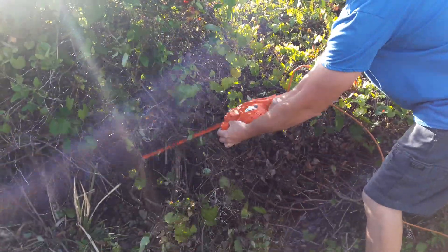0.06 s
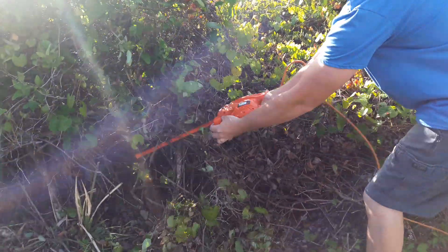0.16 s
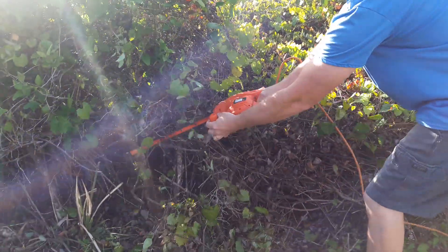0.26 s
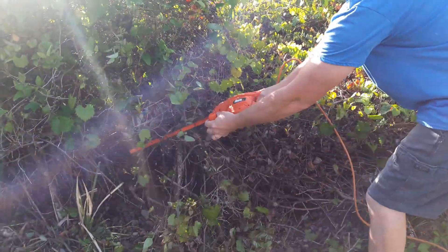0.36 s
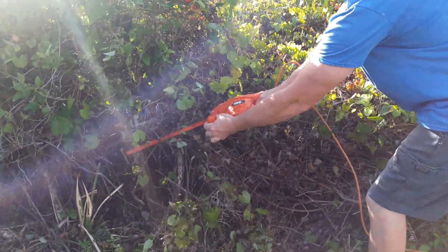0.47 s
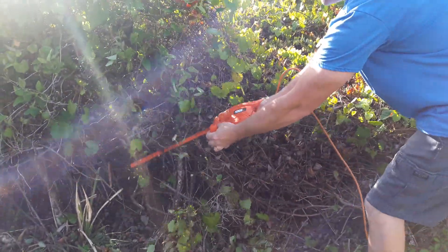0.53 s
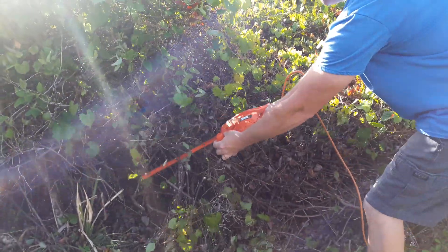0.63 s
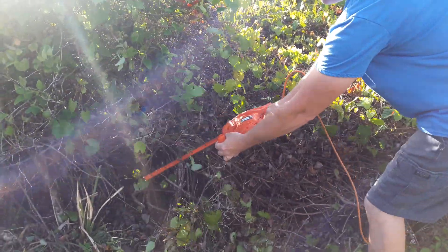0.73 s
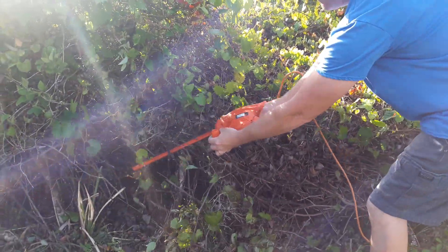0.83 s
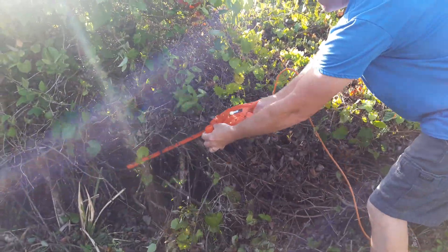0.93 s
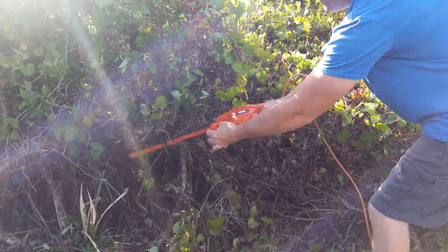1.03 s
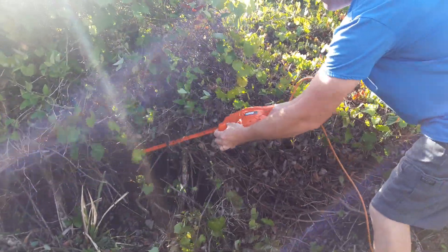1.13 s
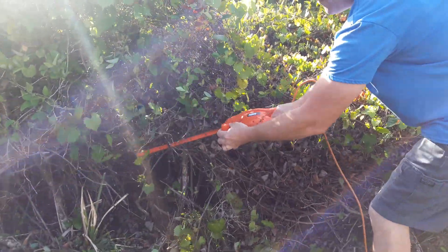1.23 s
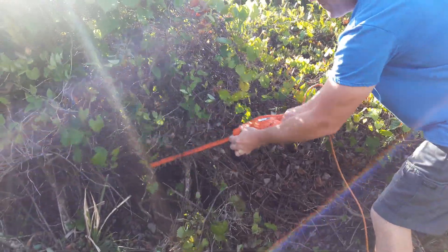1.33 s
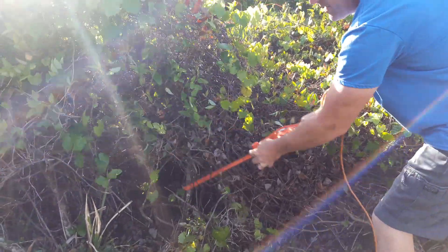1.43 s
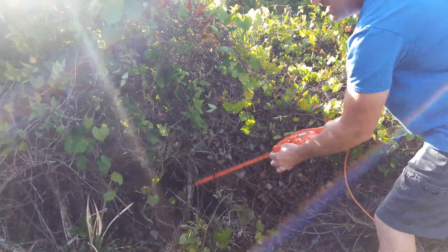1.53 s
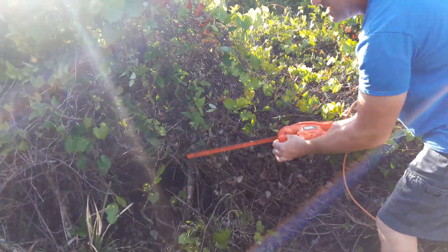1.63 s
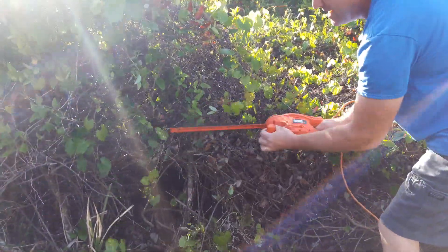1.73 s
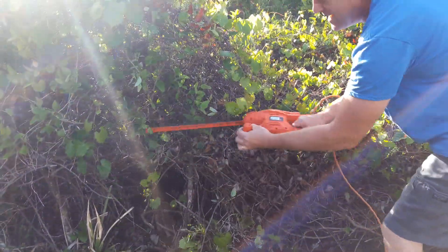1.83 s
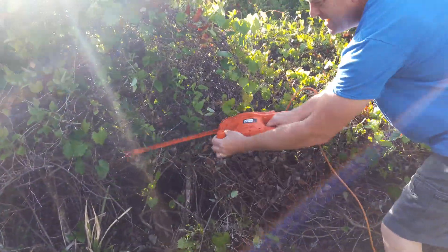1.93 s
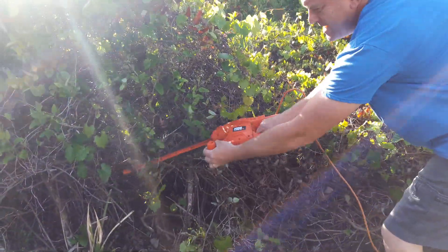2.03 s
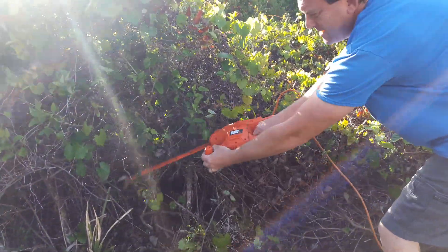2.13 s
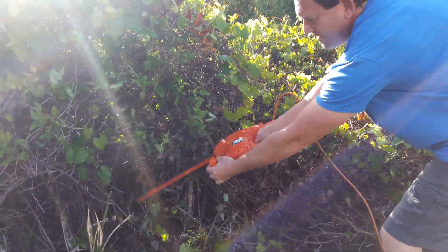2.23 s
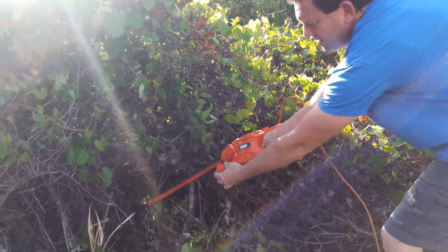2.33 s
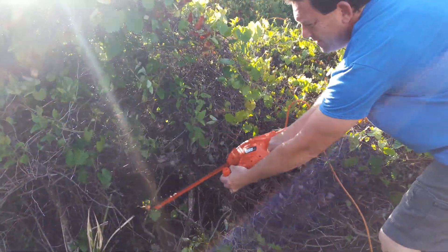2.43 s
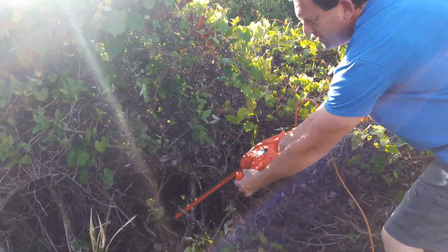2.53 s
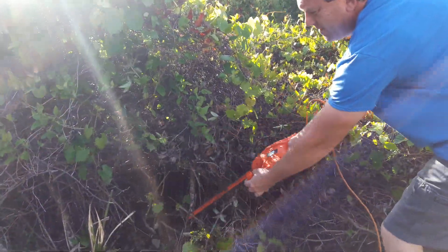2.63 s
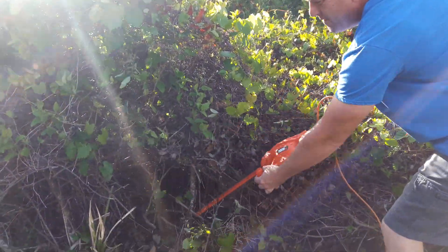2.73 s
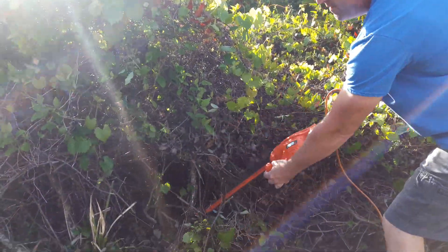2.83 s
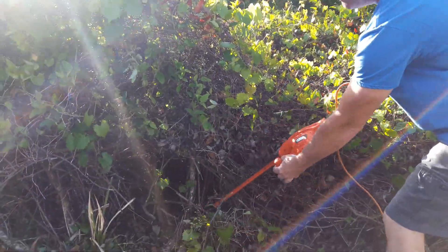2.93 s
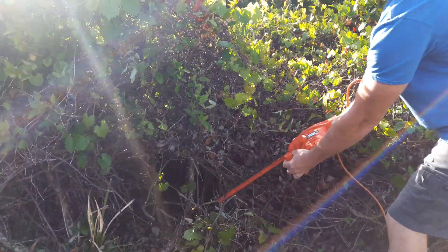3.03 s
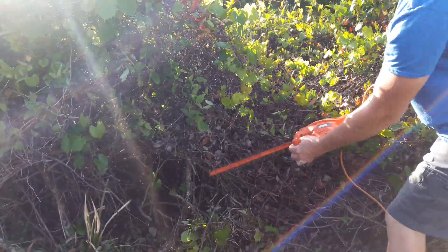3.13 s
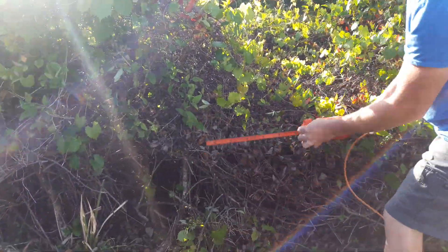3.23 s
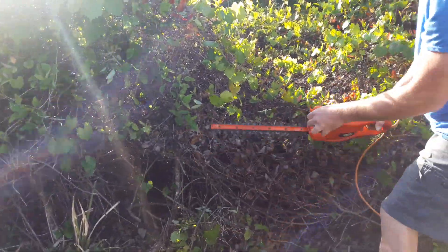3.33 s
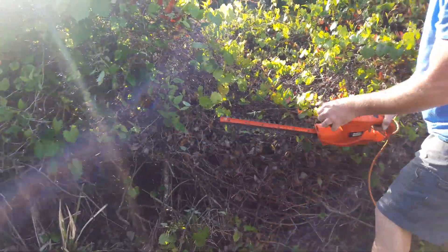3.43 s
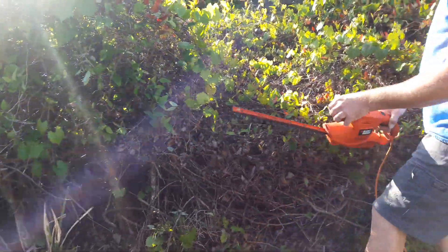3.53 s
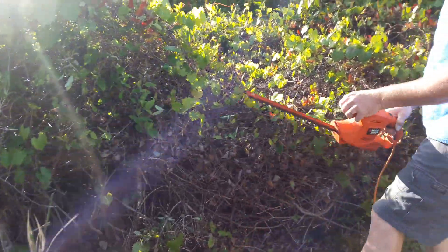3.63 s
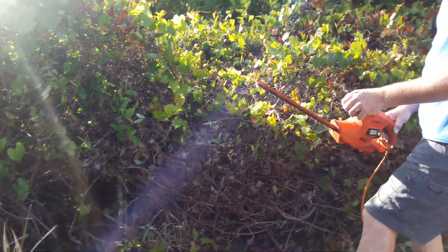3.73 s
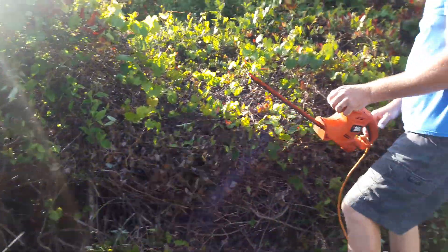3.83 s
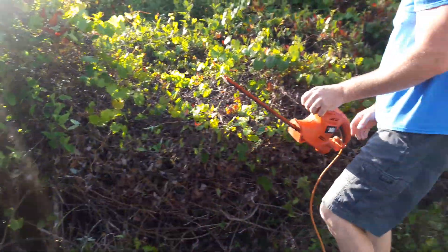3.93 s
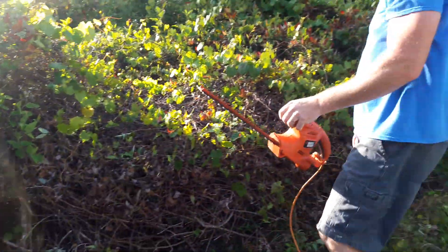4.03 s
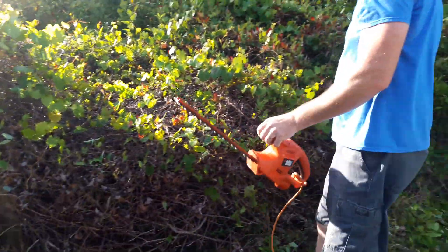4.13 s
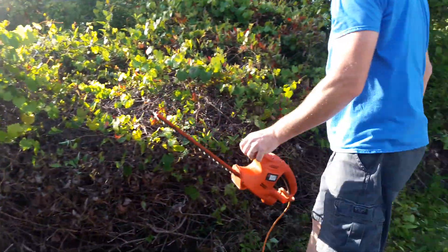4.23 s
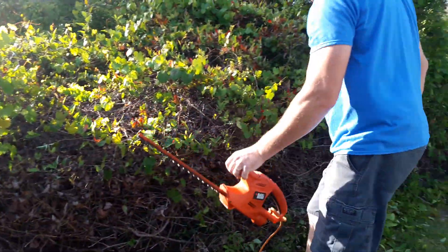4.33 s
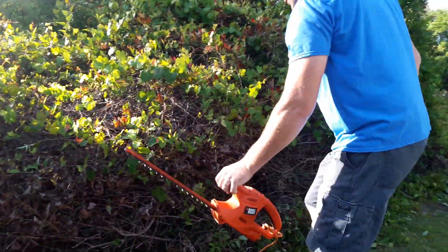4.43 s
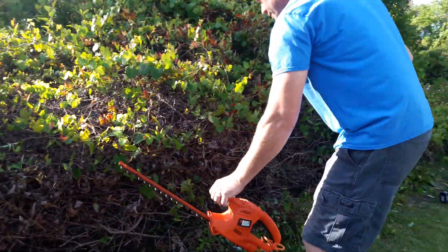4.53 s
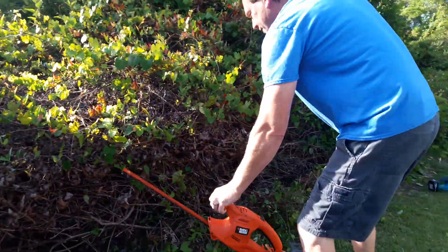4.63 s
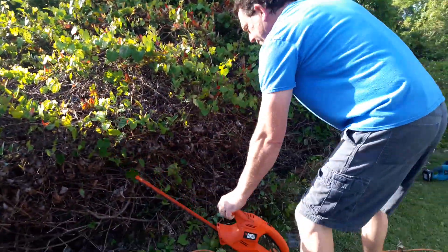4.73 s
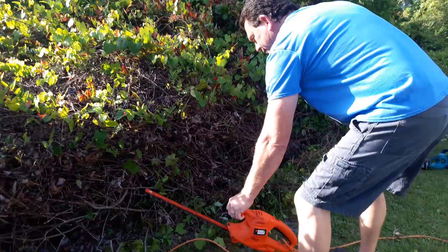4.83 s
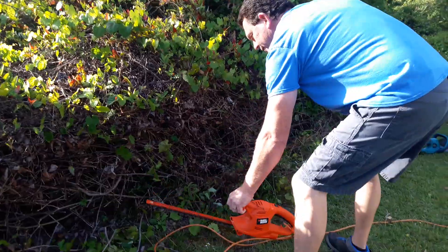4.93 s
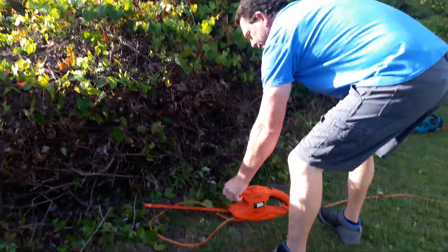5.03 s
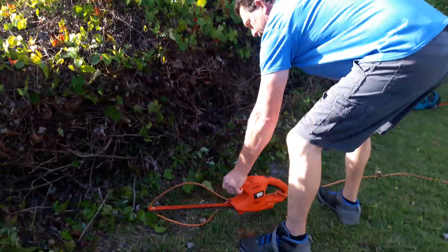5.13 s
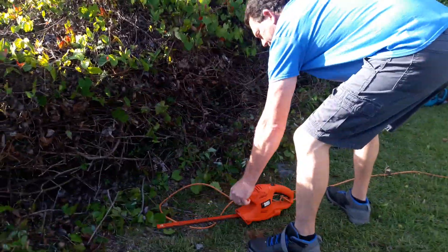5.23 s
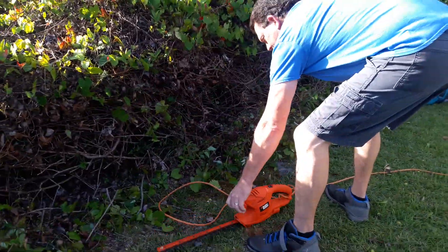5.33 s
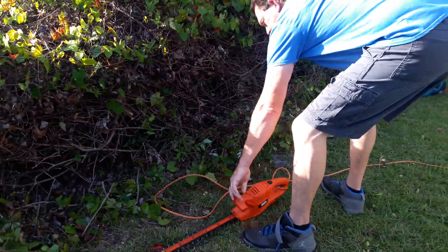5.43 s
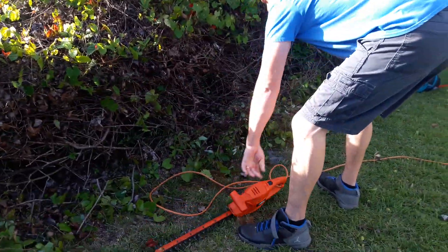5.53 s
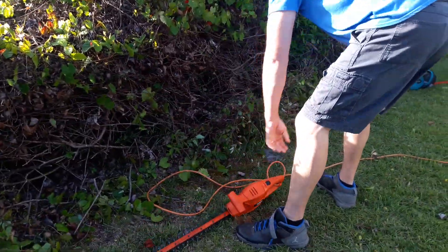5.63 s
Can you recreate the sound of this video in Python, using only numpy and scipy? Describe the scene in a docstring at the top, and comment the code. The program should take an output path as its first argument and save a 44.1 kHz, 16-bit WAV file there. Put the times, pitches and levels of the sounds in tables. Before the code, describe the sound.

Close outdoor stereo capture of an electric hedge trimmer already running: rough gear whine, gritty grinding and rapid blade chatter, with irregular twig clacks and snips as it bites into brush. Just after three seconds the power is released; the whine slides downward for about two seconds, rattling loosely, with soft footfalls and cloth rustle. It stops, and faint stalks crackle in the grass over a light breeze.

```python
"""Electric hedge trimmer in dry brush

A corded trimmer works a few steps away: meshing gears whine, sliding parts grind as noise rung through the
resonances of its body, and the blades clack at the ends of their stroke and on twigs. Switched off at 3.21 s,
it coasts to rest at 5.318 s, rattling, while it is carried off and laid in the grass. Damped thuds make the
footfalls and soft knocks; shaped noise makes snips, cloth, stalks, faint garden air and a light breeze."""
import sys
import numpy as np
from scipy import signal
from scipy.fft import rfft, irfft, next_fast_len
from scipy.io import wavfile
from scipy.ndimage import uniform_filter1d, map_coordinates

SR = 44100
rng = np.random.default_rng(int(sys.argv[2]) if len(sys.argv) > 2 else 0)


def wav_out(sig):
    """Save sig, one row per channel (or a flat mono array), as 16-bit PCM at SR to the path in sys.argv[1]."""
    wavfile.write(sys.argv[1], SR, np.round(np.clip(np.atleast_2d(sig).T, -1, 1) * 32767).astype(np.int16))


N = 250482

PINION_TEETH, WHEEL_TEETH = 6, 79  # teeth on the rotor shaft and on the wheel that drives the blades
FULL_HZ = 2400  # tooth rate at working speed
TOP_HZ = 15750  # upper band limit
OFF_S, UNLOAD_S = 3.21, 0.065  # the switch is released; time for the gears to lose their pressure
# coasting: braking by dry friction, tooth rate at which fan drag equals it, standstill
DRY_HZ_PER_S, DRAG_KNEE_HZ, STOP_S = 722.6, 1572, 5.318

# Speed under power, sagging in thick brush. Each row: time in seconds, gear tooth rate in Hz.
POWERED_SPEED = [(0, 2330), (.15, 2272), (.45, 2218), (.7, 2385), (1, 2470), (1.3, 2482), (1.56, 2488),
                 (1.64, 2440), (2.1, 2485), (2.32, 2368), (2.47, 2343), (2.6, 2404), (2.72, 2422),
                 (2.82, 2372), (2.91, 2217), (3.05, 2261), (3.2, 2320)]
# How hard the blades work in the brush. Each row: time in seconds, effort in dB.
CUTTING_EFFORT = [(0, 2), (.35, 0.5), (.75, -1.5), (1.2, 1), (1.55, -3), (1.9, -2), (2.3, 1.5), (2.7, -2),
                  (2.93, -3), (3.2, -2)]
# Resonances of housing, gearbox and blades. Each row: centre in Hz, width in Hz, relative gain in dB.
BODY_MODES = [(410, 44, -18.5), (555, 127, -9), (1097, 205, -3), (1320, 127, -9), (2186, 277, -1.5),
              (2490, 247, 2), (3374, 510, -3), (4520, 540, -6), (5555, 830, -7), (6810, 770, -9.5),
              (9070, 1100, -15), (11650, 2700, -15.5), (14200, 1900, -22.5)]
# Broad friction noise under the resonances. Each row: frequency in Hz, relative density in dB per Hz.
FRICTION_SPECTRUM = [(30, -77), (120, -57), (250, -27.5), (400, -18), (1500, -11), (1800, -18.5),
                     (2850, -31), (6000, -15.5), (8000, -17.5), (16000, -32.5)]
# Bands of housing, gearbox, blade and blade-edge hiss. Each row: lower edge in Hz, upper edge in Hz.
BODY_BAND_EDGES = [(0, 1700), (1700, 3800), (3800, 7800), (7800, 15700)]
# Sliding noise of those four bands. Each row: level in dB at full speed before effort, share of the effort,
# drop without power in dB, dB lost per tenfold slowing, tooth rate in Hz below which it dies.
SLIDING_LEVELS = [(-28.5, 0.33, 4, 17.5, 43), (-26.5, 0.49, 4, 18.5, 500), (-26.5, .9, 0.5, 26, 67),
                  (-33, 0.24, 2.1, 24, 140)]
# Treble of the blade-edge hiss. Each row: time in seconds, gain in dB.
HISS_GAIN = [(0, 1.5), (.3, 0.6), (.7, -1), (1.4, -2), (1.65, 1.5), (1.9, 0), (2.2, 0.5), (3.5, .5),
             (3.9, -3.5)]
# Blades catching on twigs. Each row: start in seconds, level in dB, then relative to it and before the
# common offsets: gearbox ring in dB, twig snap in dB.
TWIG_CLACKS = [(0.039, -10, -11, -18), (0.195, -13, -11, -4.5), (0.248, -11.5, -11, -7.5),
               (0.3183, -7.5, -14, -19), (0.3518, -6.5, -9.5, -14), (0.3885, -5, -24, -24),
               (0.4244, -11.5, -38, -18.5), (0.5506, -11, -11, -10), (1.3643, -4, -12, -32),
               (1.568, -9.5, -31, -13), (1.6023, -14.5, -21, -3), (1.8125, -7, -14.5, -18),
               (1.9789, -13.5, -5.5, -25), (2.132, -11, -9.5, -5), (2.1948, -12, -0.5, -2.5),
               (2.2425, -9, -6.5, -17.5), (2.4083, -8, -5.5, -17), (2.724, -9.5, -5, -14.5),
               (2.788, -9.5, -10.5, -15.5), (2.822, -3.5, -7.5, -21.5), (2.8564, -6, -13.5, -27.5),
               (2.8923, -6, -6.5, -24.5), (3.2257, -15, -2.5, -36), (3.2428, -8.5, -8, -17),
               (3.736, -15.5, -5.5, -31)]
# Radiation of gear overtones by the housing. Each row: frequency in Hz, gain in dB.
HOUSING_RADIATION = [(200, -28), (600, -16), (1150, 0), (1700, -13), (2400, -3), (3400, -6), (4200, 4.5),
                     (5100, -5.5), (5800, 2.5), (6900, 2), (7700, 0.5), (10000, -19), (12000, -37),
                     (16000, -34)]
# Gear overtones from the third multiple of the tooth rate upwards. Each entry: relative level in dB.
OVERTONE_LEVELS = [-3, -2, -0.5, -8.5, -1, -1.5, 1.5, -3.5, -8, -8, -13, -8.5]
# The whine's octave. Each row: time in seconds, level in dB before the body resonances.
OCTAVE_LEVEL = [(0, -40), (.35, -31.5), (.55, -28), (.9, -36.5), (2.15, -36.5), (2.45, -23.5), (2.65, -31),
                (2.92, -25.5), (3.15, -28), (3.3, -42), (3.55, -33.5), (3.9, -37.5), (4.5, -34.5)]
# Rotor hum, first multiples of the shaft rate. Each entry: level in dB at top speed before radiation.
ROTOR_LEVELS = [-46.5, -45.5, -47]
# Breeze rumble. Each row: time in seconds, level in dB before the channel balance.
BREEZE_LEVEL = [(0, -52), (.8, -63.5), (1.5, -54), (1.75, -48), (2.4, -66), (3.7, -63), (4.2, -51.5),
                (5, -48.5), (5.68, -51.5)]
# Colour of the breeze. Each row: frequency in Hz, relative density in dB per Hz.
BREEZE_SPECTRUM = [(15, -42), (30, -34), (60, -2.5), (95, 2.5), (130, 1.5), (180, -6.5), (300, -14),
                   (700, -12), (2000, -93)]
# Colour of the garden air. Each row: frequency in Hz, relative density in dB per Hz.
GARDEN_SPECTRUM = [(100, -24.5), (250, -4.5), (550, -9), (800, -14), (1200, -6.5), (1800, -21),
                   (5000, -18.5), (15500, -38)]
# Footfalls and soft knocks. Each row: start in seconds, level in dB, pitch in Hz, 60 dB decay in seconds.
THUDS = [(1.683, -33, 165, 0.062), (4.26, -35, 107, 0.076), (4.267, -33, 220, 0.046),
         (4.343, -25, 304, 0.022), (4.703, -34, 282, 0.039), (4.952, -38, 125, 0.11),
         (5.025, -39, 85, 0.13), (5.269, -44.5, 94, 0.06), (5.418, -48, 129, 0.043)]
# Resonances of the loosely rattling blades. Each row: centre in Hz, width in Hz, relative gain in dB.
LOOSE_BLADE_MODES = [(1260, 150, -9), (2820, 340, 2.5), (4160, 290, 0.5), (5030, 200, -3)]
# Resonance of the free gears in their case. Each row: centre in Hz, width in Hz, relative gain in dB.
GEARCASE_MODES = [(2490, 144, 0)]
# Clothes and cord brushing past. Each row: centre in seconds, level in dB, half length in seconds.
CLOTH_SWELLS = [(4.25, -49.5, 0.237), (4.72, -51, 0.07)]
# Grass bending under the trimmer. Each row: centre in seconds, level in dB, half length in seconds.
GRASS_SWELLS = [(5.365, -56, 0.022), (5.52, -50.5, 0.074), (5.66, -75, 0.071)]
# Colour of the bending stalks. Each row: frequency in Hz, relative density in dB per Hz.
STALK_SPECTRUM = [(100, -17), (350, 3.5), (750, -4), (1500, -11), (4000, -13.5), (10000, -21.5),
                  (15500, -35)]
# Stalks that crack under the trimmer. Each row: start in seconds, level in dB.
STALK_CRACKS = [(5.489, -46), (5.511, -46.5), (5.541, -55)]
# Echo off the lawn, closing in as the tool is lowered. Each row: time in seconds, delay in seconds.
LAWN_DELAY = [(3.9, .0031), (4.8, 0.00069)]
# Share of the side signal that is the direct wave. Each row: frequency in Hz, share from 0 to 1.
DIRECT_SHARE = [(100, .3), (400, 0.2), (1100, 0.3), (2400, 0.7), (4500, 1), (7000, .15), (16000, .05)]
# Stereo width. Each row: frequency in Hz, side minus mid in dB.
SIDE_GAIN = [(100, -1.5), (250, -16.5), (400, -26.5), (700, 0), (1100, -13.5), (1700, 5.5), (2400, -13.5),
             (3300, -4), (4500, -1.5), (7000, 2), (10000, -1), (15000, 0)]
# Stereo balance. Each row: frequency in Hz, left minus right in dB.
LEFT_RIGHT = [(250, 1), (420, 4.5), (650, 1), (1100, 0.6), (2400, -2.5), (4400, 2.5), (8000, 1),
              (12000, -1)]


def amp(db):
    """Logarithmic level: decibels become an amplitude gain."""
    return 10 ** (np.asarray(db) / 20)


def unit(x):
    """Normalisation: the signal is scaled to rms 1."""
    return x / np.sqrt(np.mean(x ** 2) + 1e-20)


def along(points, hz):
    """Log-frequency interpolation: (Hz, value) points are read between their knots."""
    knots_hz, values = np.transpose(points)
    return np.interp(np.log(hz + 1), np.log(knots_hz + 1), values)


def curves(rows):
    """Linear interpolation in time: one value per sample for each column after the time."""
    s, *columns = np.transpose(rows)
    return [np.interp(np.arange(N) / SR, s, column) for column in columns]


def wobble(rate):
    """Slow random modulation: a smooth curve through random knots, rate of them a second."""
    knots = rng.standard_normal(int(N * rate / SR) + 4)
    return map_coordinates(knots, [np.arange(N) * rate / SR])


def filtered(x, response):
    """Linear filtering: the spectrum of x is multiplied by a response of frequency."""
    m = next_fast_len(N + 8192)
    return irfft(rfft(x, m) * response(np.fft.rfftfreq(m, 1 / SR)), m)[..., :N]


def noise(spectrum):
    """Coloured noise: two unrelated channels of joint rms 1 in the given colour."""
    white = rng.standard_normal((2, N))
    return unit(filtered(white, lambda hz: amp(along(spectrum, hz))))


def burst(s, rise, fall):
    """Impulsive excitation: slice and envelope of a short swell that starts at s and peaks at 1."""
    t = np.arange(SR // 20) / SR
    shape = (1 - np.exp(-t / rise)) ** 2 * np.exp(-t / fall)
    start = int(s * SR)
    return slice(start, start + len(t)), shape / shape.max()


def swells(rows):
    """Gaussian envelopes: soft, bell-shaped swells are summed."""
    t = np.arange(N) / SR
    return sum(amp(db) * np.exp(-((t - s) / half_s) ** 2) for s, db, half_s in rows)


def resonant(modes, hz):
    """Modal resonance: the powers of steep-sided peaks add."""
    power = 0
    for centre, width, db in modes:
        power = power + amp(db) ** 2 / (1 + 2 * ((hz - centre) / width) ** 2) ** 2
    return np.sqrt(power)


def tooth_rate():
    """Braked rotation: the motor turns against the brush; then fan drag and dry friction slow it."""
    left_s = STOP_S - np.arange(N) / SR
    angle = np.clip(left_s * DRY_HZ_PER_S / DRAG_KNEE_HZ, 0, np.arctan(2))
    coast_hz = DRAG_KNEE_HZ * np.tan(angle)
    return np.minimum(curves(POWERED_SPEED)[0], coast_hz)


def coasting():
    """Unloading of the gears: 0 under power, 1 once they run free."""
    return np.clip((np.arange(N) / SR - OFF_S) / UNLOAD_S, 0, 1)


def slowed(tooth_hz, decade_db, stall_hz=90):
    """Power law of speed: the gain falls by decade_db per tenfold slowing and dies near standstill."""
    return amp(decade_db * np.log10(tooth_hz / FULL_HZ + 1e-6)) * np.tanh(tooth_hz / stall_hz)


def body(hz):
    """Body response: the tool's resonances stand over its broad friction noise, adding in power."""
    return np.hypot(resonant(BODY_MODES, hz), amp(along(FRICTION_SPECTRUM, hz)))


def body_bands(drive):
    """Forced vibration: the drive rings the body, split into four bands of rms 1."""
    rung = filtered(drive, body)
    return [unit(filtered(rung, lambda hz: (hz >= lo) & (hz < hi))) for lo, hi in BODY_BAND_EDGES]


def swing(x, depth_db=2.16):
    """Directivity: as the lobed source is swung, narrow patches of its spectrum swell and fade."""
    z = signal.stft(x, nperseg=1024)[2]
    field = rng.standard_normal(z.shape)
    field = uniform_filter1d(field, size=4, axis=1)  # across frequency
    field = uniform_filter1d(field, size=22, axis=2)  # across time
    return signal.istft(z * amp(depth_db * unit(field)), nperseg=1024)[1][:, :N]


def rubbing(teeth, knock_db=1.5, shaft_db=0.5, chatter_db=0.75, grain_db=1.53, fall=0.43):
    """Sliding friction: noise leaps at each blade reversal and throbs with each turn of the rotor."""
    strokes = 2 * teeth / WHEEL_TEETH
    force = (.5 + rng.random(int(strokes.max()) + 1))[strokes.astype(int)]  # one draw per stroke
    jolt = unit(force * np.exp(-(strokes % 1) / fall))
    shaft = np.cos(2 * np.pi * teeth / PINION_TEETH)
    pressure_db = knock_db * jolt + shaft_db * shaft + chatter_db * wobble(170) + grain_db * wobble(1800)
    return swing(amp(pressure_db) * rng.standard_normal((2, N)))


def grind(tooth_hz, teeth, drift_db=0.17, flutter_db=-0.31):
    """Friction-driven resonance: sliding gears and blades ring the body, louder with effort and speed."""
    housing, gearbox, blade, hiss = body_bands(rubbing(teeth))
    bands = housing, gearbox, blade, hiss * amp(curves(HISS_GAIN)[0])
    effort_db, = curves(CUTTING_EFFORT)
    out = 0
    for band, (db, share, off_db, decade_db, stall_hz) in zip(bands, SLIDING_LEVELS):
        level_db = db + share * effort_db - off_db * coasting()
        level_db = level_db + drift_db * wobble(4.94) + flutter_db * wobble(22.02)
        out = out + band * amp(level_db) * slowed(tooth_hz, decade_db, stall_hz)
    return out


def catches(tooth_hz, teeth, catch_db=-20.5, scatter_db=3, ring_db=-5.0, snap_db=-16, decade_db=17):
    """Reciprocating impact: a small clack of random strength at each reversal of the blades."""
    stroke = WHEEL_TEETH / 2
    reversals = np.searchsorted(teeth, np.arange(1, teeth[-1] / stroke - 2) * stroke)
    chance_db = np.clip(rng.standard_normal((len(reversals), 2)), -2, 2) * scatter_db
    speed_db = decade_db * np.log10(tooth_hz / FULL_HZ + 1e-6)
    level_db = catch_db + curves(CUTTING_EFFORT)[0] + speed_db
    return [(n / SR, level_db[n] + size, ring_db - dry / 2, snap_db + dry / 2)
            for n, (size, dry) in zip(reversals, chance_db)]


def clacks(tooth_hz, teeth, gearbox_db=-3, blade_db=-17, follow=0.44, snap_db=-4.5, tonal=0.87):
    """Impact: jolted blades make the gear teeth hammer for a few milliseconds, and wood snaps."""
    _, gearbox, blade, snap = body_bands(rng.standard_normal((2, N)))
    tonal = tonal * (1 - coasting() ** 2)  # only under power
    noisy = np.sqrt(1 - tonal ** 2)

    def hammer(k):
        """Periodic impact: a tone at a multiple of the tooth rate with an unsteady phase."""
        return np.sqrt(2) * np.sin(2 * np.pi * k * teeth + .5 * wobble(400))

    octave_db, = curves(OCTAVE_LEVEL)
    gearbox = tonal * hammer(1) + noisy * gearbox
    blade = (tonal * hammer(2) + noisy * blade) * amp(follow * (octave_db - octave_db.mean()))
    out = np.zeros((2, N))
    for s, db, ring, crack in list(TWIG_CLACKS) + catches(tooth_hz, teeth):
        at, swell = burst(s, rise=.0012, fall=.0038)
        _, sharp = burst(s, rise=0.00023, fall=0.0076)
        metal = amp(ring + gearbox_db) * gearbox[:, at] + amp(blade_db) * blade[:, at]
        wood = amp(crack + snap_db) * snap[:, at]
        out[:, at] += amp(db) * (swell * metal + sharp * wood)
    return out


def whine(tooth_hz, teeth, jitter=0.034, rough_db=4.5, slack=0.23, eccentric=0.22, lobes_db=2,
          tooth_db=-37, tooth_off_db=6, upper_db=-42, upper_free_db=4, decade_db=3, fade_hz=420,
          low_decade_db=14, low_fade_hz=600, ringing=0.52):
    """Gear mesh tones: slight backlash roughens each overtone, which swells and fades as the tool swings."""
    # with the power off the teeth mesh more loosely and the tone moves into the overtones
    free = coasting()
    loose = 1 + slack * free
    phase = 2 * np.pi * (teeth + loose * jitter * wobble(70) + 0.011 * wobble(300))

    def tone(k):
        """Harmonic motion: a rough multiple of the tooth rate, its phase drifting between mid and side."""
        size = unit(amp(loose * rough_db * wobble(60) + lobes_db * wobble(14)))
        drift = np.array([np.zeros(N), 2 * wobble(4)])
        return np.sqrt(2) * size * np.sin(k * phase + drift)

    overtones, power = 0, 1
    for k, db in enumerate(OVERTONE_LEVELS, 3):
        gain = amp(db + along(HOUSING_RADIATION, k * tooth_hz)) * (k * tooth_hz < TOP_HZ)
        overtones = overtones + gain * tone(k)
        power = power + gain ** 2
    overtones = overtones / np.sqrt(power)
    # the pinion runs slightly off centre: sidebands one shaft rate apart
    overtones = overtones * (1 + eccentric * np.cos(phase / PINION_TEETH))
    overtones = overtones * amp(upper_db + upper_free_db * free)
    # the two lowest tones swell wherever they glide through a resonance of the body
    levels_db = tooth_db - tooth_off_db * free, curves(OCTAVE_LEVEL)[0]
    lowest = sum(amp(db) * body(k * tooth_hz) ** ringing * tone(k) for k, db in enumerate(levels_db, 1))
    fade = lambda hz: np.tanh(tooth_hz / hz)
    return (overtones * slowed(tooth_hz, decade_db, fade_hz) * fade(fade_hz / 2)
            + lowest * slowed(tooth_hz, low_decade_db, low_fade_hz) * fade(low_fade_hz))


def rotor(tooth_hz, teeth, slowing=6, unsteady=0.15):
    """Unbalance: the rotor hums, fading steeply as it slows; the small housing radiates little bass."""
    angle = 2 * np.pi * teeth / PINION_TEETH + unsteady * wobble(30)
    hum = 0
    for k, db in enumerate(ROTOR_LEVELS, 1):
        hum = hum + amp(db + 1.6 * wobble(25)) * np.sqrt(2) * np.sin(k * angle)
    hum = filtered(hum, lambda hz: amp(along([(120, -40), (290, 3.5), (400, -1)], hz)))
    return hum * (tooth_hz / tooth_hz.max()) ** slowing * np.array([[1], [0]])  # mid only


def twigs(count=70, snip_db=-30, scatter_db=1.0):
    """Brittle fracture: thin stems are snipped at random while the motor is under power."""
    snips = np.zeros(N)
    for when, size in rng.random((count, 2)):
        at, shape = burst(when * OFF_S, rise=.0002, fall=0.0019)
        snips[at] += amp(snip_db + scatter_db * 2 * size) * shape
    return snips * noise([(1000, -25), (3000, -7), (7000, -15.5), (12000, 10.5), (16000, 2.5)])


def outdoors(garden_db=-58, gust_db=-2.5):
    """Turbulent pressure: a breeze buffets each microphone port almost independently, over garden air."""
    buffet = unit(noise(BREEZE_SPECTRUM) * amp(gust_db * wobble(19)))
    buffet = buffet + 0.14 * buffet[::-1]
    breeze = amp(curves(BREEZE_LEVEL)[0]) * buffet * amp([[1.5], [-2.5]])  # left and right in dB
    return breeze + amp(garden_db) * spread(noise(GARDEN_SPECTRUM))


def steps():
    """Heavy damping: footfalls and knocks are dull thuds of two quickly decaying partials."""
    out, t = np.zeros(N + SR), np.arange(SR // 5) / SR
    for s, db, hz, t60 in THUDS:
        thud = np.sin(2 * np.pi * hz * t) + 0.36 * np.sin(2 * np.pi * 1.29 * hz * t)
        envelope = amp(db - 60 * t / t60) * (1 - np.exp(-t / 0.00099))
        out[int(s * SR):][:len(t)] += envelope * thud
    return out[:N] * amp([[1], [-1]])  # left and right in dB


def rattle(tooth_hz, teeth, loose_db=-53, shake_db=6.5, shake_hz=390, width_hz=130, decade_db=3,
           chatter_db=-37, chatter_hz=750):
    """Unloaded chatter: gears ring their case; blades rattle most at the speed that shakes the bar."""
    ring = lambda modes: unit(filtered(rubbing(teeth), lambda hz: resonant(modes, hz)))
    level_db = loose_db + shake_db * np.exp(-((tooth_hz - shake_hz) / width_hz) ** 2)
    blades = amp(level_db) * slowed(tooth_hz, decade_db) * ring(LOOSE_BLADE_MODES)
    gears = amp(chatter_db) * np.tanh((tooth_hz / chatter_hz) ** 2) ** 2 * ring(GEARCASE_MODES)
    return coasting() * (blades + gears)


def brushing(flutter_db=3.0):
    """Soft friction: cloth and cord give a dull, uneven swish."""
    cloth = noise([(80, -26), (180, -10.5), (300, -2.5), (400, -1), (600, -18), (2000, -49)])
    return swells(CLOTH_SWELLS) * amp(flutter_db * wobble(35)) * cloth


def grass(crackle_db=-1.5):
    """Bending and fracture: stalks rustle and crack as the trimmer is set down."""
    cracks = np.zeros(N)
    for s, db in STALK_CRACKS:
        at, shape = burst(s, rise=.0005, fall=0.0034)
        cracks[at] += amp(db) * shape
    rustle = swells(GRASS_SWELLS) * unit(noise(STALK_SPECTRUM) * amp(crackle_db * wobble(220)))
    return rustle + cracks * noise([(500, -18), (1700, 2), (4000, -1), (10000, -10), (15500, -24)])


def lawn(x, strength=0.06):
    """Ground reflection: the direct sound is joined by its delayed copy."""
    n = np.arange(N)
    source = n - curves(LAWN_DELAY)[0] * SR
    echo = np.array([np.interp(source, n, channel) for channel in x])
    return (x + strength * echo) / np.sqrt(1 + strength ** 2)


def spread(pair):
    """Phase stereo: mid and side become left and right, part of the side a quarter-turned direct wave."""
    mid, diffuse = pair
    share = lambda hz: np.clip(along(DIRECT_SHARE, hz), 0, 1)
    side = filtered(mid, lambda hz: -1j * share(hz))
    side = side + filtered(diffuse, lambda hz: np.sqrt(1 - share(hz) ** 2))
    side = filtered(side, lambda hz: amp(along(SIDE_GAIN, hz)))
    return np.array([filtered(mid + sign * side, lambda hz: amp(sign * along(LEFT_RIGHT, hz) / 2))
                     for sign in (1, -1)])


def scene():
    """Superposition: one shaft drives whine, hum and blades, and the other sources add to them."""
    tooth_hz = tooth_rate()
    teeth = np.cumsum(tooth_hz) / SR  # teeth passed so far
    blades = lawn(grind(tooth_hz, teeth) + rattle(tooth_hz, teeth)) + clacks(tooth_hz, teeth)
    trimmer = blades + whine(tooth_hz, teeth) + rotor(tooth_hz, teeth)
    return spread(trimmer + twigs() + brushing() + grass()) + steps() + outdoors()


def record(dry):
    """Band limiting: nothing passes at or above the upper limit."""
    return filtered(dry, lambda hz: hz < TOP_HZ)


dry = scene()
out = record(dry)
wav_out(out)
```